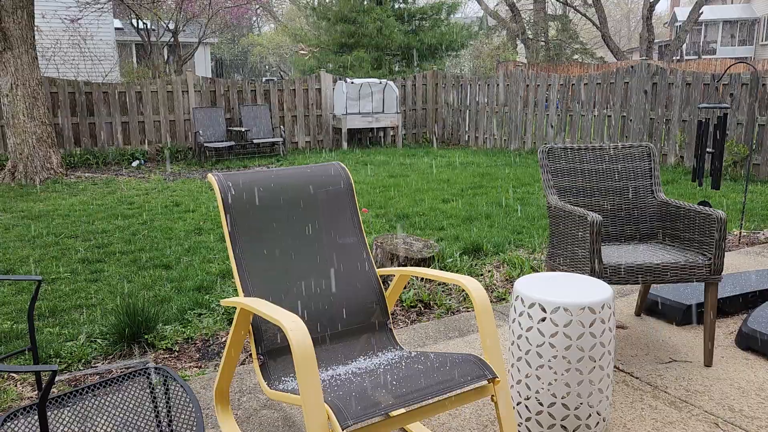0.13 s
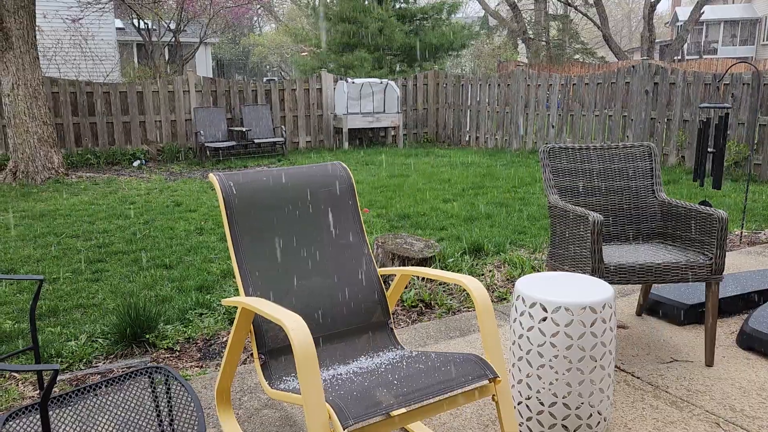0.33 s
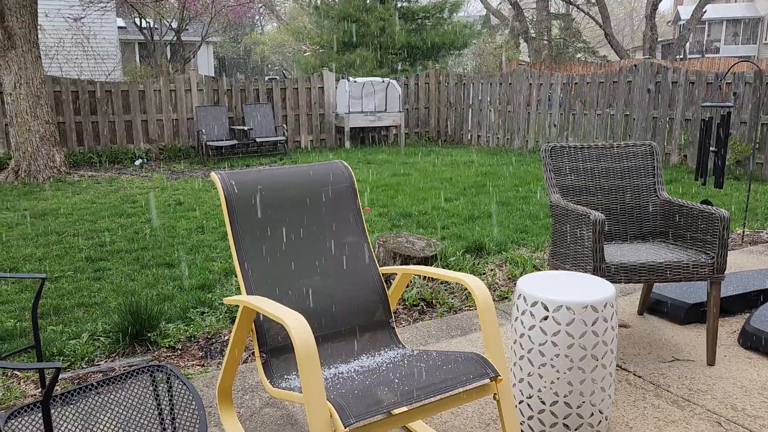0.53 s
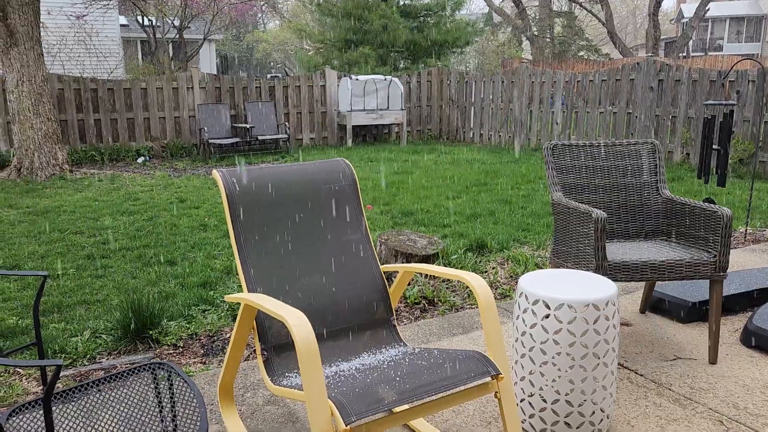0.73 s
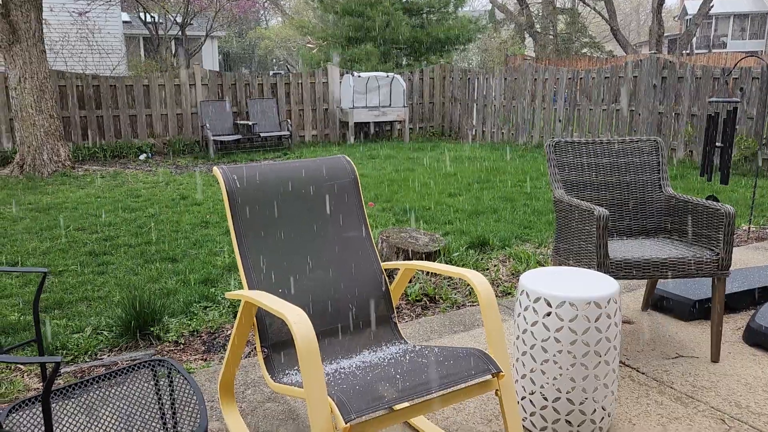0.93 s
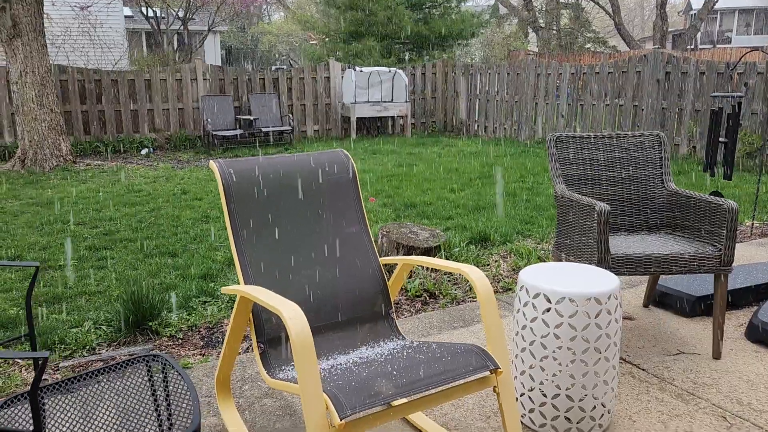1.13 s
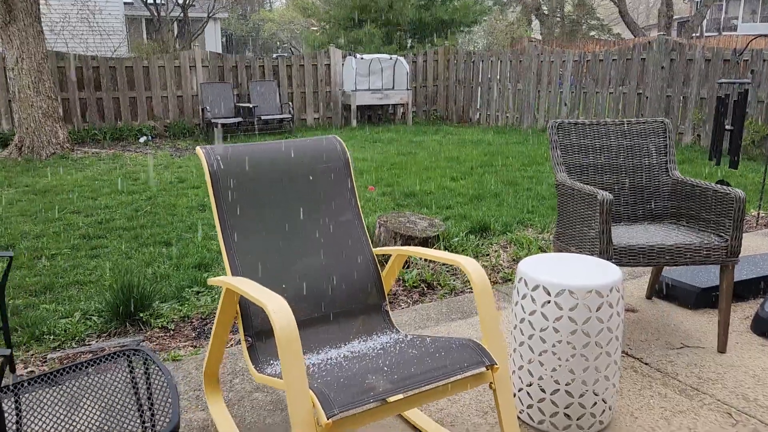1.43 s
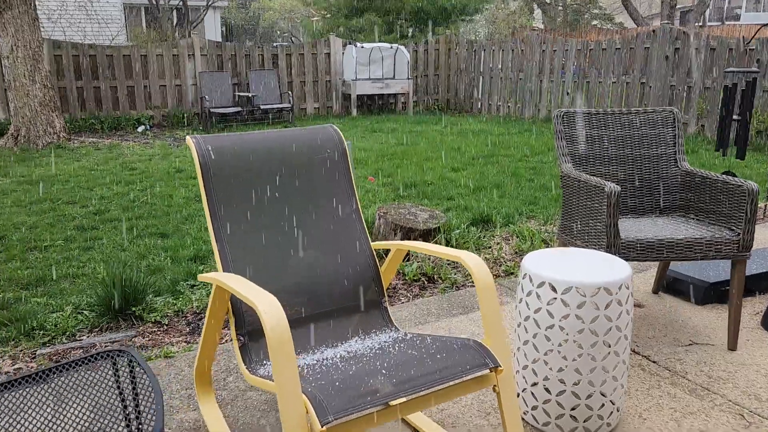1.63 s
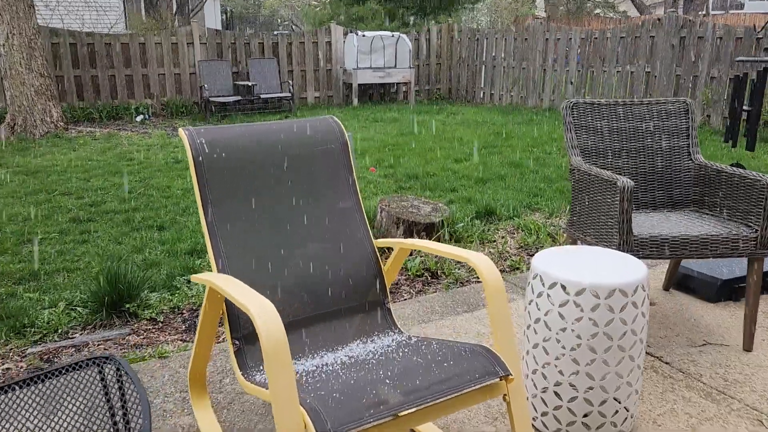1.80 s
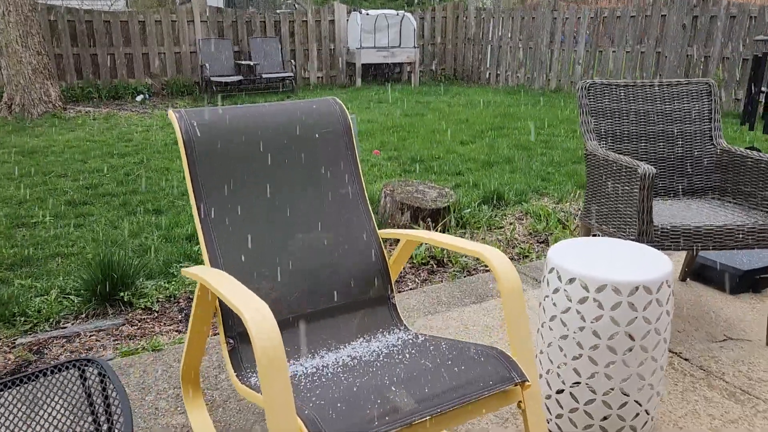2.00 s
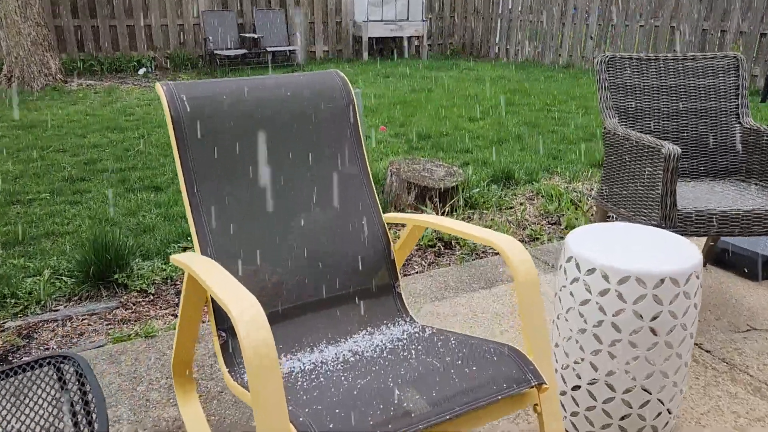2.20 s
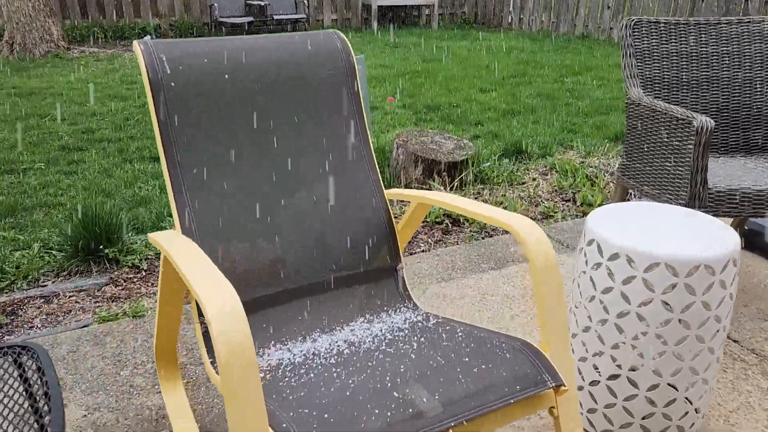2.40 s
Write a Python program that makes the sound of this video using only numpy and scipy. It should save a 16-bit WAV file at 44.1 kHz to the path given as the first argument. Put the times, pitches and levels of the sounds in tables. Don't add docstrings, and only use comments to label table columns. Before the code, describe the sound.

Small ice pellets fall with a steady fine hiss and ticking, some tapping the camera sharply

```python
import sys
import numpy as np
from scipy import signal
from scipy.fft import rfft, irfft
from scipy.io import wavfile
from scipy.ndimage import uniform_filter1d

SR = 44100
rng = np.random.default_rng(int(sys.argv[2]) if len(sys.argv) > 2 else 0)


def transcribe(signal):
    frames = np.atleast_2d(signal).T
    limited = np.clip(frames, -1, 1)
    pcm = np.round(limited * 32767).astype(np.int16)
    wavfile.write(sys.argv[1], SR, pcm)


def convert_level_to_amplitude(level_db):
    exponent = np.asarray(level_db, float) / 20
    return 10 ** exponent


N = 112455

# (frequency [Hz], width [Hz], level [dB])
CASE_MODES = [(730, 210, -7), (1190, 250, -1), (2230, 280, 2.5), (3500, 510, -7)]


def evened(x):
    return x / np.sqrt(np.mean(x ** 2) + 1e-20)


def read(points, hz):
    f, value = np.transpose(points)
    return np.interp(np.log(hz + 1), np.log(f + 1), value)


def curve(points):
    s, db = np.transpose(points)
    return convert_level_to_amplitude(np.interp(np.arange(N) / SR, s, db))


def add(mix, s, sound):
    part = mix[:, round(s * SR):][:, :sound.shape[1]]
    part += sound[:, :part.shape[1]]


def sides(db):
    return convert_level_to_amplitude(np.array([[db / 2], [-db / 2]]))


def modes(table, t):
    total = 0
    for hz, width_hz, db in table:
        lag_rad = np.array([[0], [hz / 1500]])
        total = total + convert_level_to_amplitude(db) * np.sin(2 * np.pi * hz * t - lag_rad) * np.exp(-np.pi * width_hz * t)
    return total


def noise(shape_db, patchy_db, size, alike=1):
    # (frequency [Hz], left-right likeness [0..1])
    likeness = [(60, 1), (180, 1), (550, 0.91), (1650, 0), (4970, 0.11), (15000, 0)]
    # (frequency [Hz], left-right difference [dB])
    tilt_db = [(25, -3), (60, 0.5), (240, -2.5), (950, -1), (3770, -2), (15000, 5)]
    frames, hz = 4 * N // size + 5, np.fft.rfftfreq(size, 1 / SR)
    a, b, c, d, patches = rng.standard_normal((frames, len(hz), 5)).T
    patches = evened(uniform_filter1d(uniform_filter1d(patches, 10, 0), 10, 1))
    same = np.clip(alike * read(likeness, hz), -1, 1)[:, None]
    left = a + 1j * b
    right = same * left + np.sqrt(1 - same ** 2) * (c + 1j * d)
    z = np.array([left, right])
    z *= convert_level_to_amplitude(shape_db(hz)[:, None] + patchy_db * patches)
    z *= convert_level_to_amplitude(np.outer([.5, -.5], read(tilt_db, hz)))[:, :, None]
    return evened(signal.istft(z, nperseg=size, noverlap=3 * size // 4)[1][:, :N])


def hiss_db(hz):
    # (frequency [Hz], density [dB per Hz])
    colour = [(210, -37), (350, -1.5), (379, -10), (643, -6.5), (1240, -3), (1410, -7), (2310, -1),
              (7550, -1.5), (16000, -9.5)]
    # (frequency [Hz], width [Hz], gain [dB])
    ports = [(2244, 445, 4), (1680, 460, -1.5), (5150, 1200, 1), (10130, 1050, -3.5), (11430, 720, 3),
             (16700, 800, 7)]
    resonance_db = sum(db * np.exp(-((hz - f) / width_hz) ** 2) for f, width_hz, db in ports)
    return read(colour, hz) - 40 * (hz > 15850) + resonance_db


def fall():
    # (time [s], level [dB])
    fall_level = [
        (.07, -47),
        (.5, -46.5),
        (.9, -47),
        (1.3, -46),
        (1.7, -46.5),
        (2.1, -46),
        (2.4, -46),
        (2.55, -43),
    ]
    ticks_per_s, ticks_db, spread_db, kinds = 1500, -3, 3, 24
    size = convert_level_to_amplitude(spread_db * np.minimum(rng.exponential(1, N), 4)) * (rng.random(N) < ticks_per_s / SR)
    kind = rng.integers(0, kinds, N)
    t = np.arange(160) / SR
    ticks = np.zeros((2, N))
    for k in range(kinds):
        grain = rng.standard_normal((2, 160)) * np.exp(-t / 0.00041) * sides(rng.normal(0, 8.4))
        ticks += signal.oaconvolve((size * (kind == k))[None], grain, axes=1)[:, :N]
    ticks = irfft(rfft(ticks) * convert_level_to_amplitude(hiss_db(np.fft.rfftfreq(N, 1 / SR))), N)
    hiss = noise(hiss_db, patchy_db=-0.35, size=512) * 1.014
    return curve(fall_level) * convert_level_to_amplitude(3.5) * (hiss + convert_level_to_amplitude(ticks_db) * evened(ticks))


def strike(db, hz, crack_db, pan_db, luck):
    # (frequency [Hz], level [dB])
    upper_modes = [(4700, -3.5), (6400, 0.5), (7900, -2), (11400, -1.5), (13600, -8.5)]
    t = np.arange(luck.shape[1]) / SR
    swell = (t / 0.00039) ** 2 * np.exp(2 - 2 * t / 0.00027)
    tone = np.sin(2 * np.pi * hz * t * (1 - 15 * t) - np.array([[0], [2.2]]))
    tone = tone * (swell + 0.16 * np.exp(-t / 0.00072)) * sides(2.55 * pan_db)
    push = np.sin(2 * np.pi * 1300 * t - np.array([[0], [1.8]])) * np.exp(-t / 0.00034) * convert_level_to_amplitude(-7.5)
    shell = 0
    for k, (f, g) in enumerate(upper_modes):
        mode_hz = f * (1 + 0.037 * luck[:, [k + 8]])
        phase = luck[:, [k + 16]]
        shell = shell + convert_level_to_amplitude(g + 2.1 * luck[:, [k]]) * np.sin(2 * np.pi * (mode_hz * t + phase))
    grit = evened(signal.lfilter(*signal.butter(2, [1800, 12000], "band", fs=SR), luck))
    crack_shape = (t / 0.0004) * np.exp(1 - t / 0.00031) + 0.15 * np.exp(-t / 0.00049)
    crack = (evened(shell) + 0.74 * grit) * crack_shape
    return convert_level_to_amplitude(db + 3) * (tone + push + convert_level_to_amplitude(crack_db - 10.5) * crack * sides(0.41 * pan_db))


def ring(db, hz, ms, pan_db):
    t = np.arange(-400, 400) / SR
    return convert_level_to_amplitude(db) * sides(pan_db) * np.cos(2 * np.pi * hz * t) * np.exp(-(t * 1000 / ms) ** 2 / 2)


def creak(db, low_hz, upper_db, pan_db, luck):
    t = np.arange(luck.shape[1]) / SR
    snap = np.exp(-((t - .0011) / .00004) ** 2)
    slip = snap + 0.077 * luck[0] * np.exp(-t / 0.0052)
    body = modes([(low_hz, 280, 0), (0.98 * low_hz, 500, -6)], t)
    body = body + convert_level_to_amplitude(upper_db + 13.5) * modes(CASE_MODES[2:], t)
    driven = signal.fftconvolve(slip[None], body, axes=1)[:, :len(t)]
    sound = signal.lfilter(*signal.butter(2, 420, "high", fs=SR), driven)
    return convert_level_to_amplitude(db + 1.5) * sides(pan_db) * sound / abs(sound).max()


def rustle():
    # (time [s], level [dB])
    grip = [
        (1.66, -79),
        (1.69, -46),
        (1.73, -50),
        (1.76, -39),
        (1.87, -49),
        (1.93, -59),
        (2.25, -71),
        (2.42, -65),
        (2.49, -41.5),
        (2.55, -56),
    ]
    slips_per_s = 600
    slips = convert_level_to_amplitude(4.1 * rng.exponential(1, N)) * (rng.random(N) < slips_per_s / SR) * rng.choice([-1., 1.], N)
    body = modes(CASE_MODES, np.arange(500) / SR)
    return curve(grip) * evened(signal.oaconvolve(slips[None], body, axes=1)[:, :N])


def knock():
    start_s, pop_hz, thump_hz, length_ms = 2.5015, 2263, 950, 0.66
    t = np.arange(N) / SR - start_s
    bell = np.exp(-(t * 1000 / length_ms) ** 2 / 2)
    pop = np.sin(2 * np.pi * pop_hz * t) * bell
    thump = convert_level_to_amplitude(-12.0) * np.sin(2 * np.pi * thump_hz * t) * bell ** 2
    return convert_level_to_amplitude(-11.5) * sides(5.5) * (pop + thump)


def tube():
    start_s, stop_s, t60_s, hz, db = 1.372, 1.53, 0.99, 1483, -47
    t = np.arange(N) / SR - start_s
    shape = np.clip(t / 0.01, 0, 1) * np.clip((stop_s - start_s - t) / .03 + 1, 0, 1)
    return convert_level_to_amplitude(db - 60 * np.maximum(t, 0) / t60_s) * shape * np.sin(2 * np.pi * hz * t)


def rumble():
    # (frequency [Hz], density [dB per Hz])
    colour = [(12, -35), (20, -1.5), (107, 5), (162, -4.5), (198, -8.5), (231, -13), (295, -9), (349, -20),
              (600, -14.5), (780, -45), (1320, -120)]
    # (time [s], level [dB])
    gusts = [(0.13, -50), (1.38, -52), (1.41, -42.5), (1.52, -53.5), (1.53, -48), (1.97, -48.5),
             (1.99, -50.5), (2.1, -48.5), (2.27, -48.5), (2.38, -42.5), (2.48, -53), (2.53, -44.5)]
    # (frequency [Hz], level [dB rms])
    motor = [(97, -68.5), (192, -66), (298, -66)]

    def wind_db(hz):
        return read(colour, hz) - 40 * (hz > 600) - 30 * (hz < 18)

    wind = noise(wind_db, patchy_db=2.0, size=2048, alike=.87)
    waver = evened(uniform_filter1d(rng.standard_normal((len(motor), N)), 2000))
    hum = 0
    for (hz, db), w in zip(motor, waver):
        hum = hum + convert_level_to_amplitude(db + 4) * np.sin(2 * np.pi * np.cumsum(hz * (1 + 0.055 * w)) / SR)
    return curve(gusts) * convert_level_to_amplitude(.5) * wind + hum


def scene():
    # (time [s], peak [dB], ring [Hz], crack [dB], left-right [dB])
    strikes = [(0.379, -19, 5700, 6.5, -4.5), (0.4086, -37, 6850, 4, 13), (0.4770, -7.5, 3600, -2, -6.5),
               (0.5414, -39, 6510, 15, 1.5), (0.5756, -17.5, 3570, -1, -5.5), (0.695, -22.5, 6000, 0.5, -2),
               (0.9201, -26.5, 2570, -5, 4.5), (0.9573, -33, 4550, 9.5, 0), (1.3383, -15.5, 4900, -2.5, -4),
               (1.3963, -8.5, 3480, 1.5, -7), (1.5298, -23, 4500, 2.5, -3.5),
               (1.5975, -20.5, 3210, 1.5, -6.5), (1.736, -19.5, 3500, -4, 0), (1.9423, -28, 3320, -26, -5),
               (1.9943, -15.5, 2720, -5.5, -5.5), (2.4339, -21.5, 5400, 5.5, -4),
               (2.4584, -21, 3100, -1, -2), (2.528, -28, 3300, 4, -5)]
    # (time [s], peak [dB], lower mode [Hz], upper modes [dB], left-right [dB])
    creaks = [(1.678, -29, 710, -18.5, -2), (1.686, -39, 1290, -33, 0), (1.718, -36, 1180, -8, 0),
              (1.738, -27.5, 910, -12, -7), (1.7533, -24, 1240, -17, -3), (1.764, -27, 1140, -10, 3),
              (1.773, -20, 1070, -10, -2), (1.786, -28, 1150, -12, -4), (1.798, -20, 1220, -9, -1),
              (1.8181, -21, 1332, -12, -1), (1.834, -29, 552, 3, 4), (1.8548, -17.5, 825, -8, -0.5),
              (1.864, -29.5, 1240, -29, -3), (1.873, -33, 1200, -19, -2), (1.903, -37, 598, 5, 1),
              (1.9193, -27, 1360, -28, -5), (2.275, -26.5, 1190, -3, -2), (2.4345, -31, 1100, -8, 1),
              (2.448, -25.5, 1090, -12, 0), (2.477, -29, 844, -19, -4), (2.487, -20, 991, 0, 0),
              (2.515, -31, 1020, 0, -2), (2.532, -37, 1050, -11, -3), (1.695, -35, 1290, -27, -4),
              (1.756, -32.5, 800, -8, -4), (1.8206, -30, 835, -19, -4), (1.853, -27, 1200, -21, -2),
              (2.441, -33, 1090, -22, -2), (2.469, -35, 1000, 0, 3), (2.4975, -24, 1000, 10, 2),
              (2.509, -28, 1000, 0, -5), (2.519, -33, 1000, 8, -4)]
    # (time [s], peak
    # [dB], frequency [Hz], length [ms], left-right [dB])
    rings = [(.3791, -29, 7700, 0.4, -12), (.3789, -22, 13800, .25, 8), (.47741, -22.5, 4340, .25, -9),
             (.4773, -18.5, 2100, 0.2, -7), (.4770, -24.5, 10500, 0.41, -5), (.4770, -24.5, 6270, 0.43, 9),
             (.4773, -24, 8300, 0.3, -10), (0.5758, -27.5, 1550, 0.29, -19.5), (.5763, -28, 4900, .35, -13),
             (0.576, -32.5, 6680, .35, -8), (.5763, -30, 11000, 0.33, -8), (1.3386, -37, 2500, 0.52, -2),
             (1.3394, -24.5, 3550, 0.27, -16), (1.3385, -26, 13000, .3, 9), (1.3385, -26, 8000, 0.38, 4),
             (1.3957, -25.5, 2730, .3, 11), (1.3966, -17, 6600, .25, -13),
             (1.3966, -16.5, 11500, 0.098, -19), (1.3964, -23, 5300, 0.22, 0),
             (1.3962, -23.5, 7900, 0.28, 11), (1.5980, -19, 11500, 0.12, -17), (1.5980, -23, 8440, .3, -4),
             (1.5983, -26.5, 2520, 0.37, 9), (1.9946, -24.5, 4560, 0.22, -17), (2.489, -29, 3300, 0.36, 5),
             (2.4890, -29.5, 5000, .4, 0), (2.5018, -34, 3200, .4, -10), (2.4375, -34, 1120, 2.5, -4),
             (1.689, -41.5, 1250, 3.2, 0), (.409, -37, 6350, 1.8, 1), (1.3, -21, 1860, .3, -11),
             (0.33, -30, 5300, .4, -13), (.6950, -34, 11600, .4, -8), (0.45, -32, 3300, 0.48, -8),
             (2, -30, 12700, 0.26, 4)]
    mix = fall() + rumble() + tube() + rustle() + knock()
    for (s, *row), luck in zip(strikes, rng.standard_normal((len(strikes), 2, 300))):
        add(mix, s, strike(*row, luck))
    for (s, *row), luck in zip(creaks, rng.standard_normal((len(creaks), 2, 700))):
        add(mix, s, creak(*row, luck))
    for s, *row in rings:
        add(mix, s - 400 / SR, ring(*row))
    return mix


def roll_off(x):
    return signal.sosfilt(signal.butter(12, 16960, fs=SR, output="sos"), x)


def record(dry):
    start_s, fade_s, top_hz = 0.07, 0.00052, 16300
    gate = np.clip((np.arange(N) / SR - start_s) / fade_s, 0, 1)
    lowpass = signal.firwin(255, top_hz, window=("kaiser", 9), fs=SR)
    mix = signal.oaconvolve(dry * gate, lowpass[None], "same")
    return roll_off(mix)


dry = scene()
out = record(dry)
transcribe(out)
```